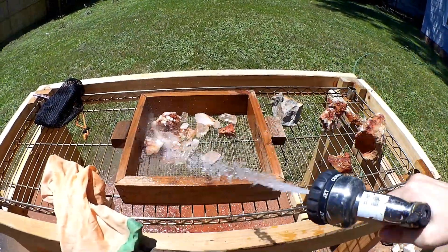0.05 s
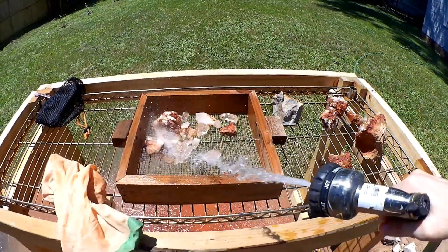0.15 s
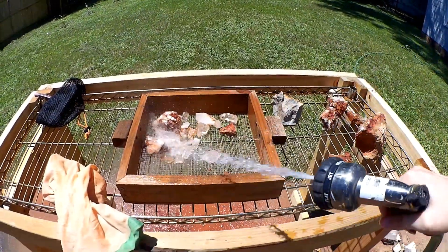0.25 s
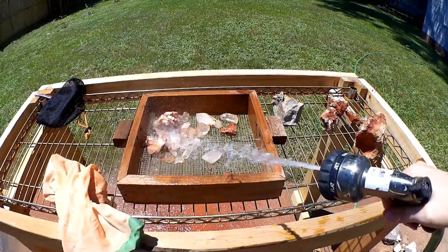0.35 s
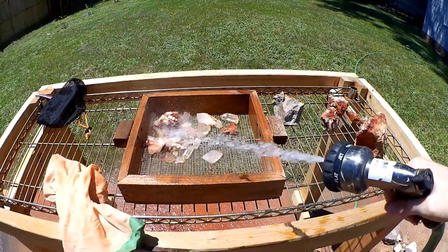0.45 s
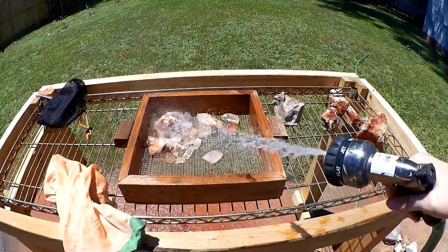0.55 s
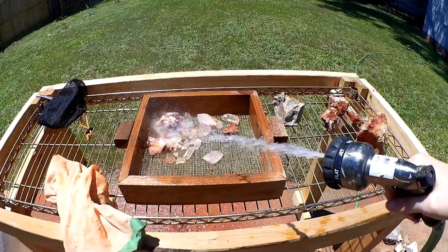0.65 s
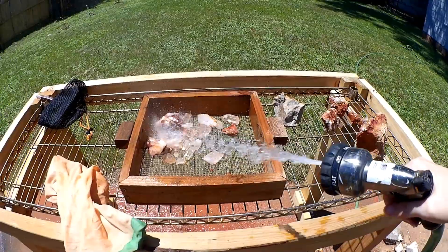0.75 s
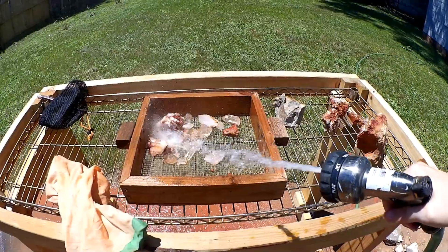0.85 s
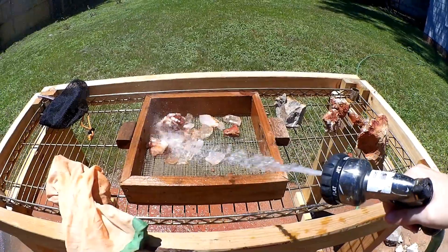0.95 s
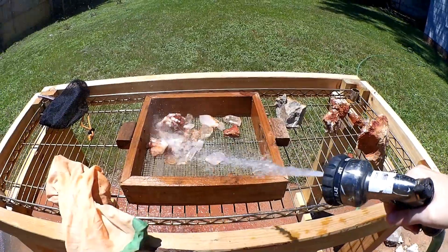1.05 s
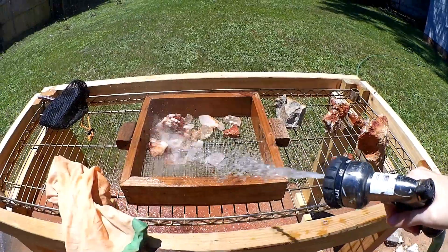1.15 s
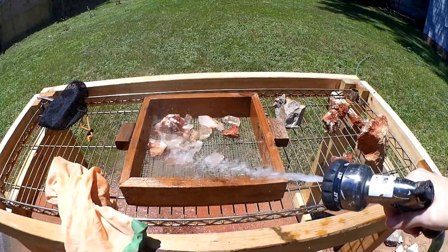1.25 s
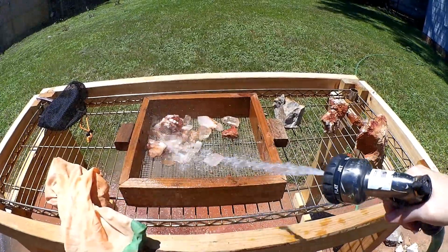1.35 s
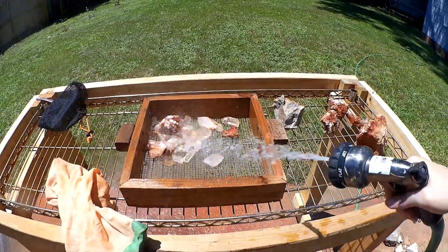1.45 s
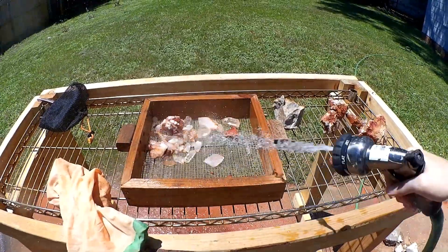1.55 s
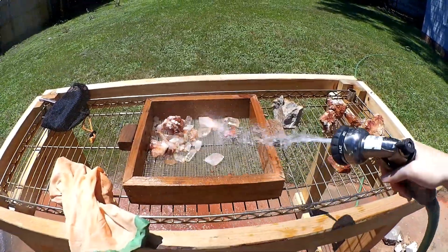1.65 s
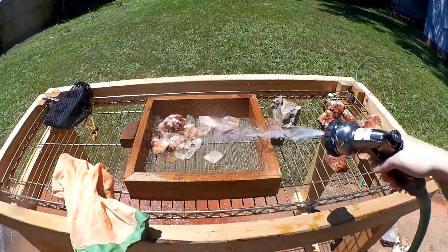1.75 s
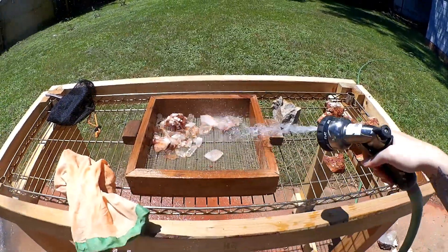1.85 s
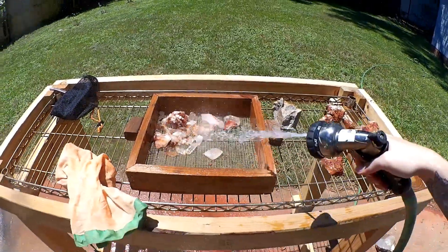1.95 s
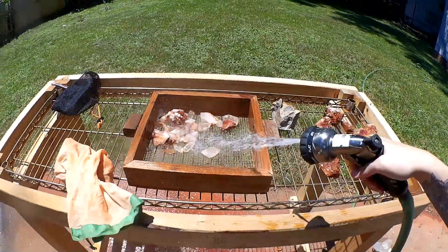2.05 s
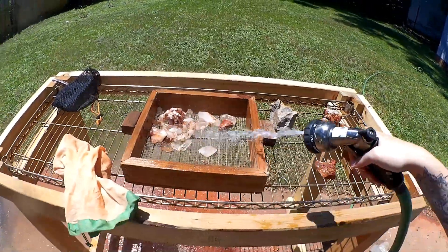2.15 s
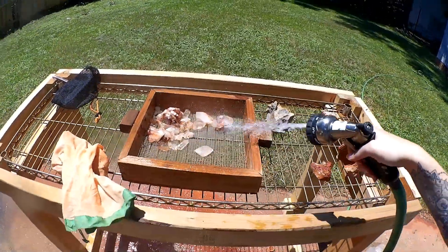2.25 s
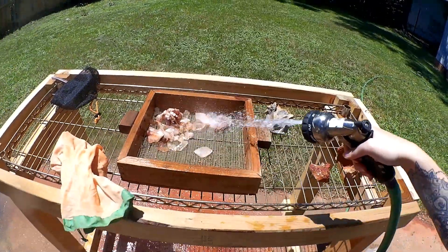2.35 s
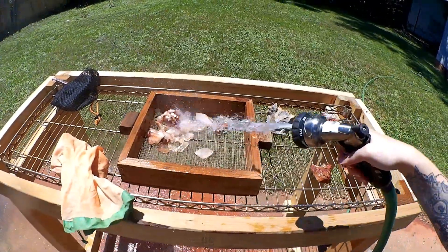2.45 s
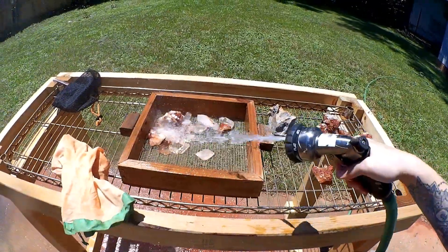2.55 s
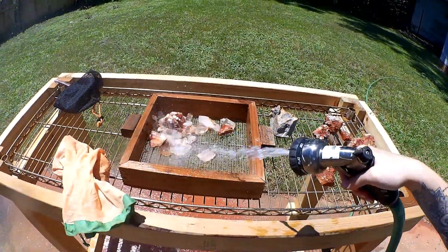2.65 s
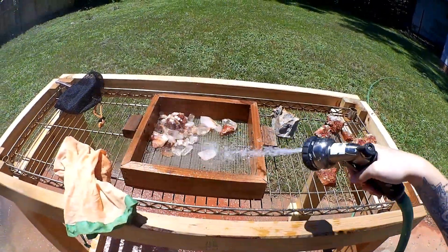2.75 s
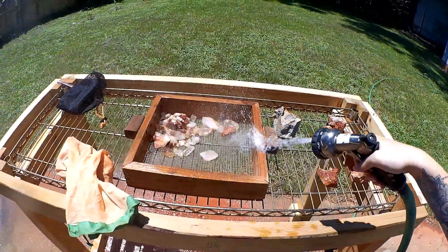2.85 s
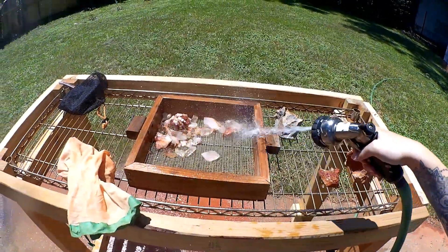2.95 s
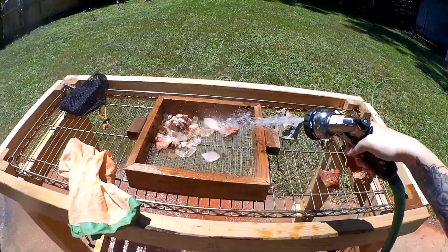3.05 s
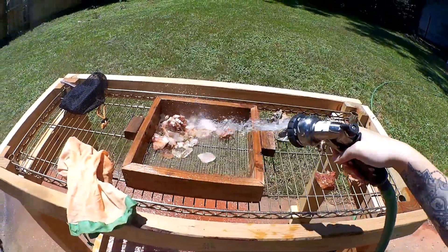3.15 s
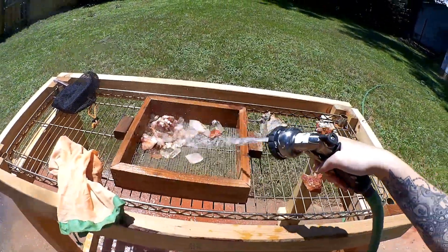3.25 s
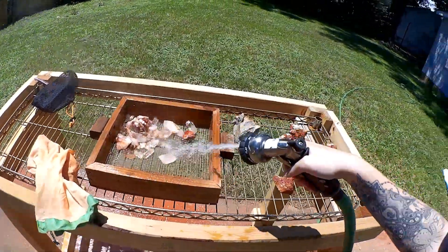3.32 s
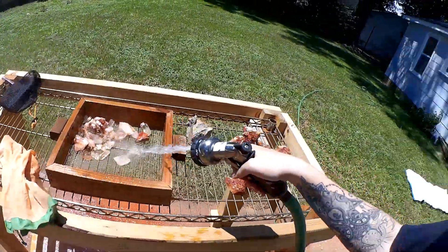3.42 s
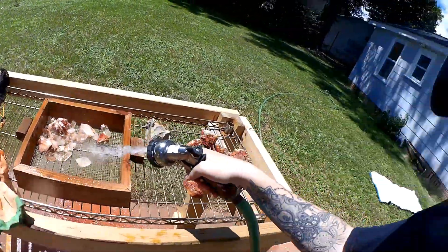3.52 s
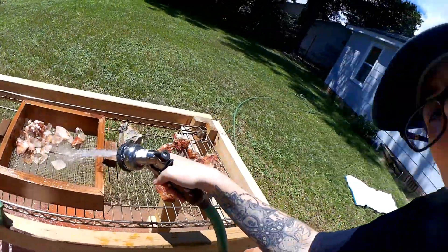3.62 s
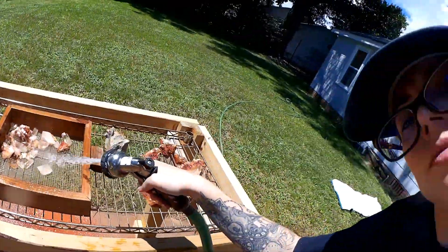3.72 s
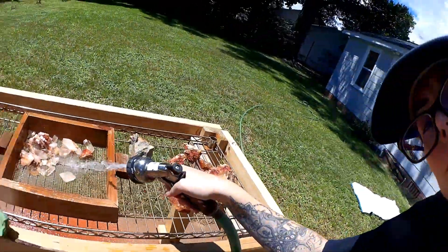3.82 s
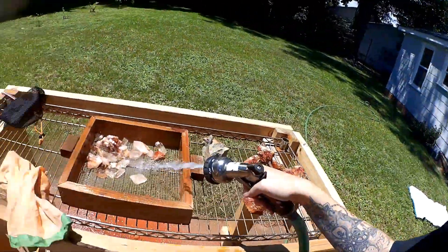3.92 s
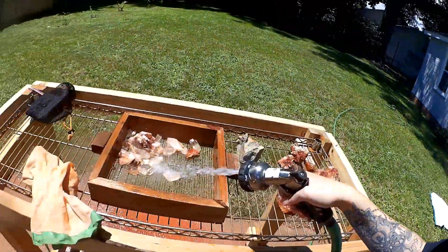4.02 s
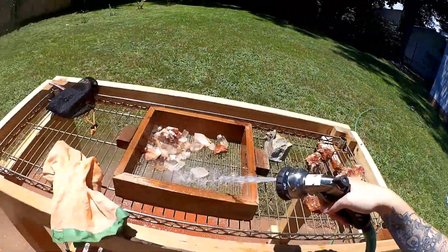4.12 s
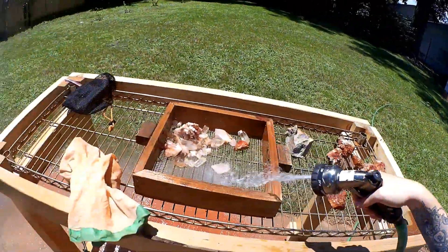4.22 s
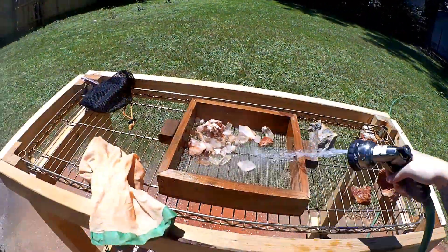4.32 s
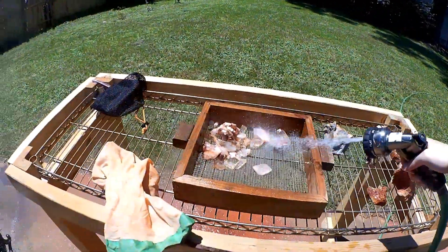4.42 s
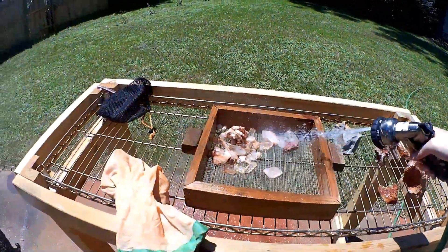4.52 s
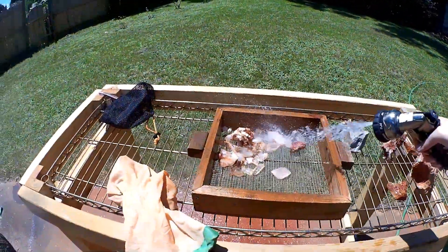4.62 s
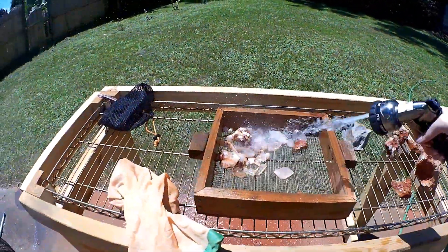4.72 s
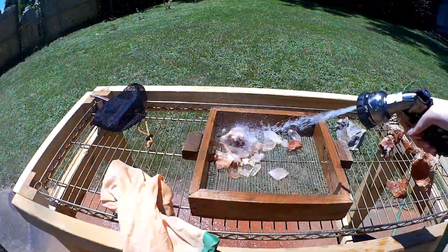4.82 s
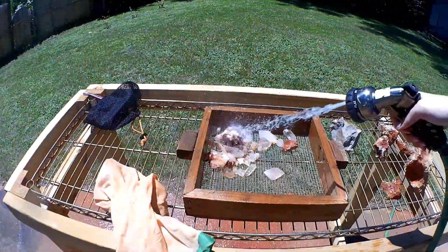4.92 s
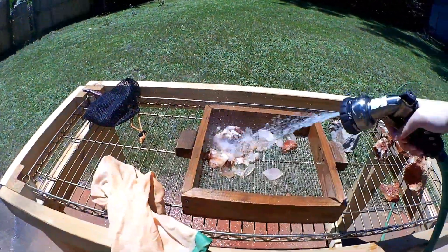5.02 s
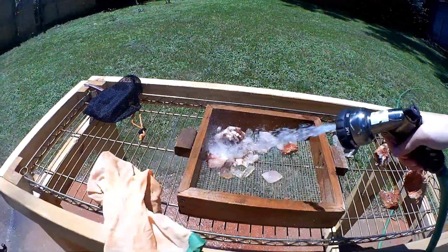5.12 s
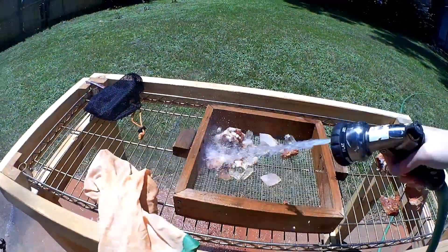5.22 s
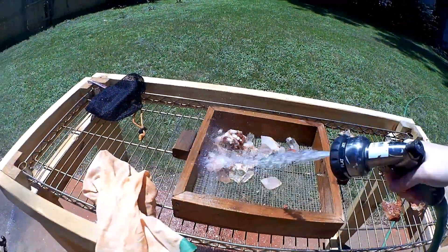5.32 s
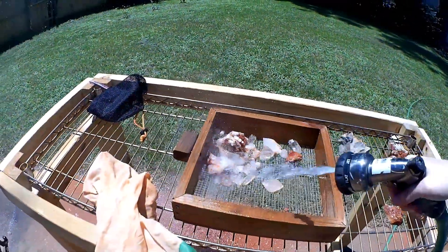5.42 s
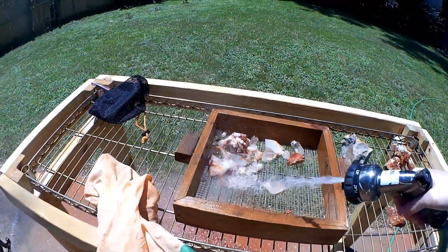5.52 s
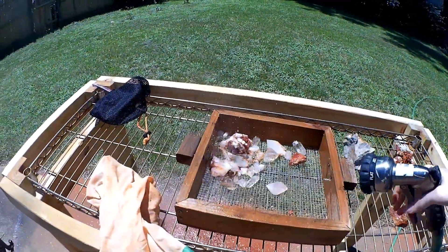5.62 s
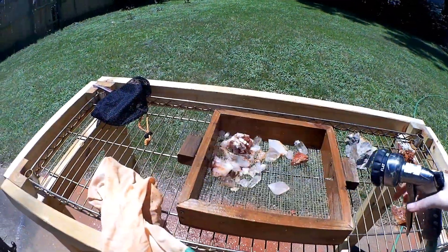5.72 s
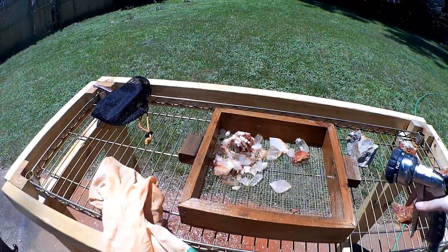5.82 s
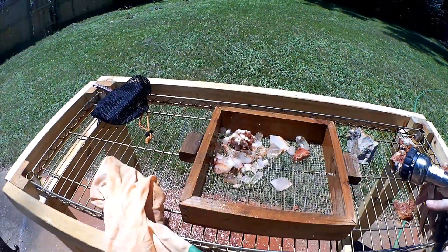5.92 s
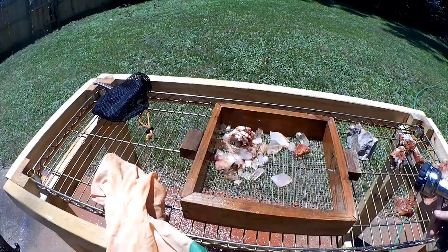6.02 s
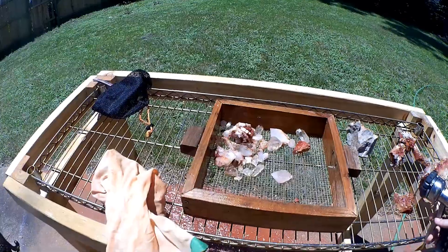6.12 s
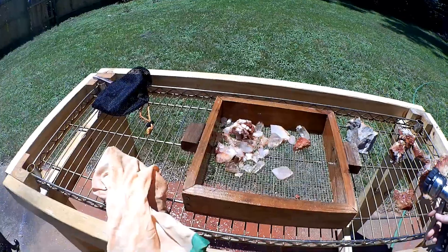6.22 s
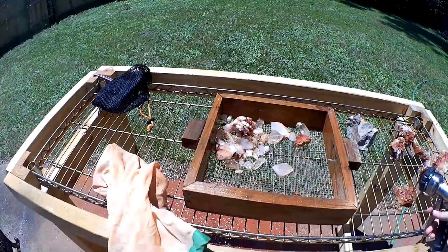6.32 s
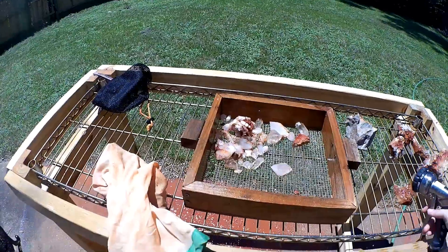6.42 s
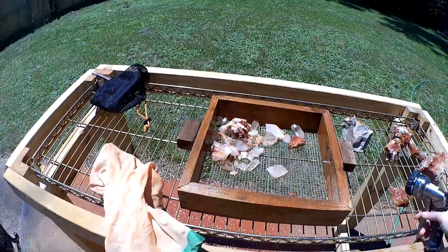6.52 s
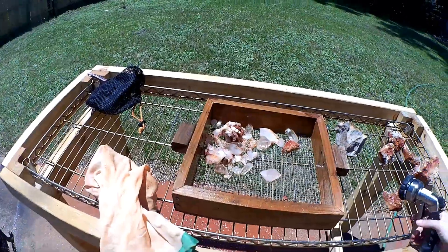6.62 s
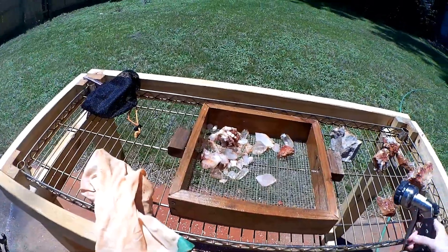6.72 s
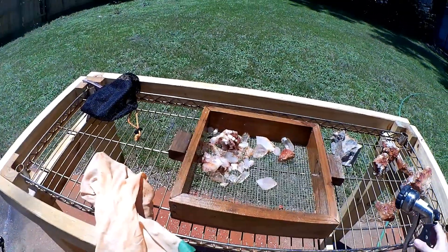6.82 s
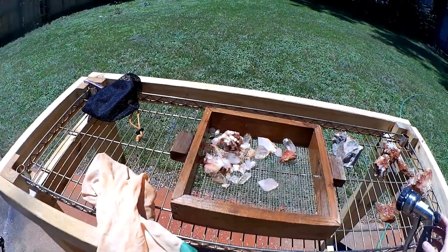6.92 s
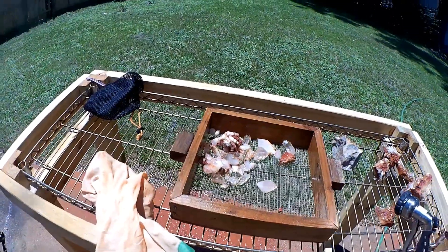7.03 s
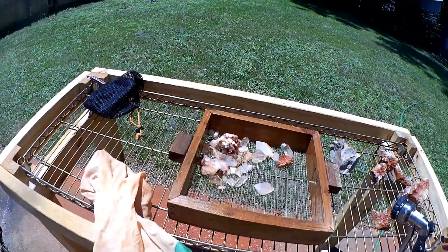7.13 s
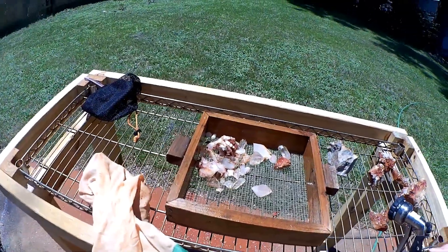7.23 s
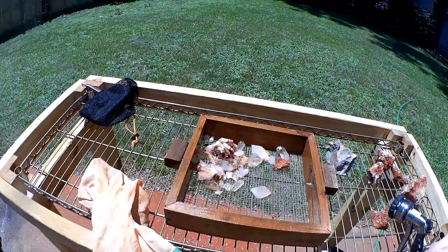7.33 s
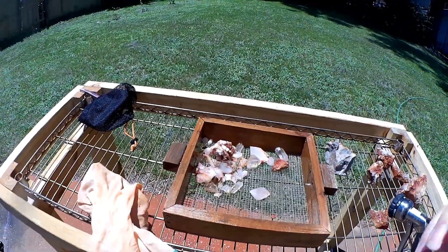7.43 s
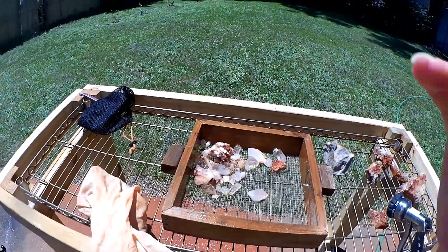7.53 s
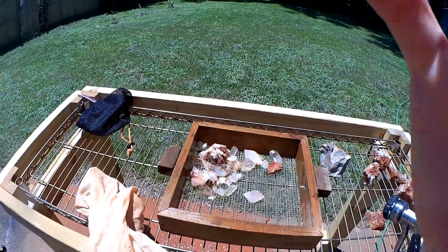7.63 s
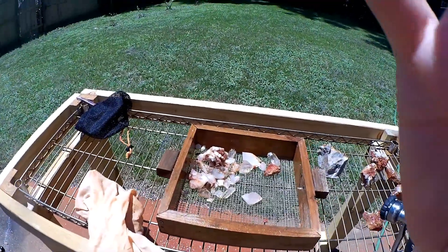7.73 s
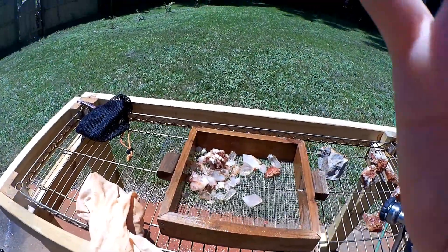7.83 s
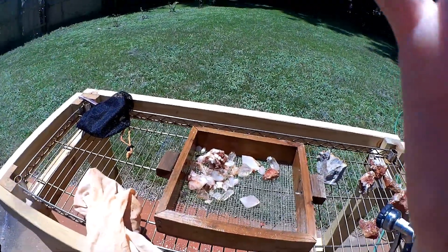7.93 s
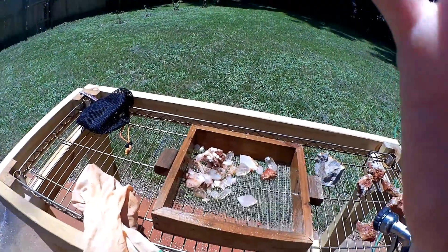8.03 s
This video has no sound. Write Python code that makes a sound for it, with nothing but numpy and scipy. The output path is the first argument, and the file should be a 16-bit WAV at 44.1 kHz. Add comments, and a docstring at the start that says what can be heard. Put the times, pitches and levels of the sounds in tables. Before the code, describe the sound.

Bright, spattering hose spray drums on stones and mesh outdoors amid light wind bumps, stops abruptly, and leaves sparse drips and faint handling sounds.

```python
"""A hose jet hisses and crackles first: its drops smack rocks and a wire screen before a hand-held camera.
The valve shuts, water trickles and drips off, the nozzle clicks; gusts buffet the two microphone ports over
a faint outdoor hum. Water is noise shaped by random impact envelopes and coloured by filters; wind is low
noise, its level set by the gusts, with single pressure pulses. Stones and nozzle give decaying sines; scuffs
are grainy noise through modes.
"""
import sys
import numpy as np
from scipy import signal
from scipy.fft import rfft, irfft, next_fast_len
from scipy.io import wavfile
from scipy.ndimage import uniform_filter1d, map_coordinates

SR = 44100
rng = np.random.default_rng(int(sys.argv[2]) if len(sys.argv) > 2 else 0)


def log_audio(samples):
    """Write samples as a 16-bit WAV file to the path given in sys.argv[1]."""
    # one column per channel
    frames = np.atleast_2d(samples).T
    # limit to full scale, then quantise
    limited = np.clip(frames, -1, 1)
    pcm = np.round(limited * 32767).astype(np.int16)
    wavfile.write(sys.argv[1], SR, pcm)


N = 355878

# Far hum of the neighbourhood. Each row: frequency in Hz, relative density in dB per Hz.
OUTDOOR_SPECTRUM = [(30, -14), (207, -3), (323, -9), (805, -5.5), (1220, -10.5), (2060, -14), (4170, -23.5),
                    (5860, -31), (8670, -30), (15400, -43)]
# Coherence of the hum at the ports. Each row: frequency in Hz, left-right likeness (0 to 1).
OUTDOOR_LIKENESS = [(60, .56), (200, 1), (800, 0.8), (2400, 0.41), (8000, .2)]

# Wind turbulence at the ports. Each row: frequency in Hz, relative density in dB per Hz.
BUFFET_SPECTRUM = [(25, -21.5), (139, 5), (291, 0), (487, -13.5), (700, -12.5), (910, -33.5), (1540, -120)]
# Gusts. Each row: start in seconds, length in seconds, buffet level in dB, left-right difference in dB.
GUSTS = [(.74, 0.13, -61, -12), (1.096, 0.18, -48.5, -6), (1.466, 0.087, -43, -4),
         (1.593, 0.029, -44.5, -1), (1.66, 0.028, -36.5, 0), (1.711, 0.055, -43.5, 8),
         (1.81, 0.063, -49, 10), (1.921, 0.069, -44.5, 11.5), (2.033, 0.11, -47.5, 8),
         (2.272, 0.075, -50, 8.5), (2.551, 0.025, -51, 12), (2.67, 0.076, -46.5, 5), (2.858, 0.07, -50, 6),
         (3.709, 0.25, -42.5, 7), (4.546, 0.13, -52, 5), (7.787, 0.078, -59, -16), (7.934, 0.06, -58, -12)]
# Single eddies. Each row: start in seconds, level in dB, left-right difference in dB.
PUFFS = [(1.091, -32.5, -14), (1.497, -30, 15), (1.763, -37, 8), (1.782, -30, 7), (2.033, -32.5, 16),
         (2.299, -35.5, 14), (3.787, -34.5, 10), (3.857, -32, -27), (3.896, -30.5, -17), (3.952, -35.5, 12),
         (4.098, -34.5, 10)]
GUST_RISE_DB_PER_S, GUST_FALL_DB_PER_S, CALM_DB = 300, 347, -72.5
# Above the edge, buffeting grows as this power of the gust, matching the low part at the strong level.
EDGE_HZ, EDGE_POWER, STRONG_DB = 217, 1.8, -35

RUMBLE_DB, RUMBLE_FROM_HZ = -69, 180  # low rumble while the water runs

# Short scuffs of hand or nozzle. Each row: start in seconds, length in seconds, level in dB.
RUBS = [(6.484, 0.068, -53.5), (7.712, 0.045, -64)]
# Modes that ring when scuffed. Each row: frequency in Hz, width in Hz, level in dB.
RUBBED_MODES = [(422, 51, -2), (890, 60, -1), (1223, 52.4, 0.5), (2080, 150, -6), (3650, 200, -4.5),
                (7100, 870, -12)]
# Stones tip against one another, and the nozzle clicks at 6.648 s.
# Each row: start in seconds, level in dB, ring frequency in Hz.
KNOCKS = [(.244, -23.5, 1870), (4.459, -24.5, 1500), (4.466, -22.5, 2000), (5.424, -22.5, 2630),
          (6.648, -37.5, 2340)]
KNOCK_CYCLES = 9.2  # cycles in which a knock decays by 60 dB

# Single drops, a dull knock at 3 s and the noisy part of the nozzle's click at 6.648 s.
# Each row: start in seconds, level in dB, low part in dB relative to that level.
SMACKS = [(1.0874, -13, -28), (3, -26, -2), (4.121, -19.5, -14), (5.2912, -7.5, -17), (5.727, -35, -16),
          (5.734, -29.5, -19), (5.765, -39, -5), (5.8145, -31, -12), (5.839, -34.5, -18),
          (5.8932, -27.5, -10), (5.9, -32, -13.5), (5.922, -34.5, -8), (5.967, -33, -9),
          (5.9808, -34.5, -3.5), (6.015, -27.5, -20), (6.022, -29, -5), (6.0872, -35.5, -8),
          (6.118, -33.5, -20), (6.147, -32.5, -16), (6.1497, -30.5, -14), (6.1675, -30, -24),
          (6.2075, -39.5, -19), (6.2215, -32.5, -16.5), (6.231, -31, -25), (6.2538, -23.5, -23),
          (6.324, -34, -19), (6.3392, -47.5, -3), (6.3798, -36.5, -26), (6.434, -35.5, -25),
          (6.56, -42.5, -15), (6.648, -27, -7), (6.796, -48, -15), (7.0797, -43, -11), (7.309, -49, -13),
          (7.43, -48, -34), (7.6174, -46.5, -17)]
SHUT_S, SHUT_DB_PER_S = 5.685, 704  # the valve closes and the jet dies
# Water running off fades, then stops.
RUNOFF_DB, RUNOFF_DB_PER_S, DRAINED_S, DRAIN_DB_PER_S = -56, 5, 6.02, 64
DAMP_DB, DAMP_DB_PER_S = -71, 8  # the faint patter that lingers

# A hollow spot under the jet. In order: start in seconds, end in seconds, pitch in Hz, width in Hz, level in dB.
HOLLOW = (3.5, 4.1, 1100, 110, -54)
# How hard the wandering jet strikes stone. Each row: time in seconds, spray level in dB.
SPRAY_LEVEL = [(0.03, -31.5), (0.14, -35.5), (0.35, -33.5), (0.86, -33.5), (1.09, -30.5), (1.65, -38),
               (1.85, -34), (2.22, -41), (2.28, -35.5), (2.63, -33.5), (2.78, -39.5), (3.27, -35.5),
               (3.3, -40.5), (3.82, -43), (4.12, -38.5), (4.16, -42.5), (4.37, -41), (4.58, -34),
               (4.61, -40.5), (4.7, -34), (4.785, -38), (4.81, -30.5), (5.02, -30.5), (5.25, -37),
               (5.3, -33.5), (5.68, -32)]
# Mid spatter against the spray. Each row: time in seconds, relative level in dB.
SPATTER_LEVEL = [(.76, -4.5), (1, -7.5), (1.35, -6), (2, -6.5), (2.5, -5), (4.7, -6), (4.9, -4), (5.2, -5)]
# The jet's dull drumming on stones and frame. Each row: time in seconds, level in dB.
DRUM_LEVEL = [(0.03, -42.5), (0.85, -45), (1.24, -42.5), (2.04, -46.5), (3.93, -48), (4.91, -44),
              (5.68, -43)]
# Small drops. Each row: frequency in Hz, relative density in dB per Hz.
FIZZ_SPECTRUM = [(5600, -35.5), (6200, -8.5), (7100, 0), (8400, -0.5), (10000, -6.5), (12000, -17.5),
                 (14000, -26), (15500, -43.5)]
# Middle part of the spray. Each row: frequency in Hz, relative density in dB per Hz.
SPATTER_SPECTRUM = [(1410, -35), (2400, -6.5), (2590, -8.5), (3250, -2), (4040, 2.5), (4490, -2),
                    (5210, -1), (6200, -8), (8060, -38), (13600, -120)]
# Big drops on stone and frame. Each row: frequency in Hz, relative density in dB per Hz.
DRUM_SPECTRUM = [(260, -21), (450, -19), (809, -9.5), (1380, -9.5), (1950, -3.5), (2600, -8.5),
                 (3380, -11.5), (5720, -120)]
# Fizz level re the spray; beyond the facing bearing, fizz gives way as the camera turns.
FIZZ_DB, FACING_US, SHADE_DB_PER_US = -0.5, 26, 0.0633

# Turn of the camera. Each row: time in seconds, lead of the left port in microseconds.
BEARING = [(0, 21.6), (1, 14.5), (2.8, 2.2), (3.3, 19.5), (3.7, 60), (4.1, 17), (4.6, 4.1)]
# Coherence of the near sources at the ports. Each row: frequency in Hz, left-right likeness (0 to 1).
NEAR_LIKENESS = [(4000, 0.96), (6000, 0.63), (8500, 0.73), (14000, 0.5)]
# Colour of the ports. Each row: frequency in Hz, left-right difference in dB.
PORT_COLOUR = [(900, -3.5), (2000, -1), (3800, -1), (5400, -4), (7000, -1), (8800, 3.5), (12000, 0)]
NOTCH_HZ, NOTCH_WIDTH_HZ, TOP_HZ = 7940, 230, 15540


def amp(db):
    """Decibels are logarithmic: twenty of them are a tenfold gain."""
    return 10 ** (np.asarray(db) / 20)


def unit(x):
    """Normalisation: dividing by the root mean square gives rms 1."""
    return x / np.sqrt(np.mean(x ** 2) + 1e-20)


def along(points, hz):
    """Interpolation of (Hz, value) points on a logarithmic frequency axis."""
    f, v = np.transpose(points)
    return np.interp(np.log(hz + 1), np.log(f + 1), v)


def curves(rows):
    """Linear interpolation in time: one curve for each column after the seconds."""
    s, *cols = np.transpose(rows)
    return [np.interp(np.arange(N) / SR, s, c) for c in cols]


def span_db(start, end, rise_db_per_s, fall_db_per_s):
    """Exponential onset and decay: 0 dB from start to end, straight slopes in dB on either side."""
    t = np.arange(N) / SR
    before = np.maximum(start - t, 0)
    after = np.maximum(t - end, 0)
    return -rise_db_per_s * before - fall_db_per_s * after


def wobble(rate):
    """Slow random fluctuation: a spline through random knots, rate of them a second."""
    knots = rng.standard_normal(int(N * rate / SR) + 4)
    return map_coordinates(knots, [np.arange(N) * rate / SR])


def filtered(x, response):
    """Linear filtering: the spectrum of x times a complex response of frequency."""
    m = next_fast_len(N + SR // 2)
    return irfft(rfft(x, m) * response(np.fft.rfftfreq(m, 1 / SR)), m)[..., :N]


def coloured(x, spectrum, size=4096):
    """Minimum phase: folding the cepstrum makes a causal filter with this spectrum."""
    level_db = np.maximum(along(spectrum, np.fft.rfftfreq(size, 1 / SR)), -70)
    cepstrum = irfft(np.log(amp(level_db)), size)
    cepstrum[1:size // 2] *= 2
    cepstrum[size // 2 + 1:] = 0
    impulse = irfft(np.exp(rfft(cepstrum)), size)
    return signal.fftconvolve(x, impulse[None], axes=1)[:, :N]


def resonance(f, hz, width_hz):
    """Resonance: the band-pass response of one damped mode, 1 at its centre."""
    return 1j * f * width_hz / (hz ** 2 - f ** 2 + 1j * f * width_hz)


def paired(x, alike):
    """Coherence: two unrelated signals mixed as sum and difference to a left-right likeness."""
    def turn(hz):
        return np.arccos(np.clip(along(alike, hz), -1, 1)) / 2

    mid, side = filtered(x, lambda hz: np.array([np.cos(turn(hz)), np.sin(turn(hz))]))
    return np.array([mid + side, mid - side])


def impacts(rate, spread_db, burst_s, bed=0.83):
    """Shot noise: rate random smacks a second, power decaying by e in burst_s, over a steady mist (bed)."""
    sizes = (rng.random(N) < rate / SR) * amp(spread_db * np.clip(rng.standard_normal(N), -3, 2.5))
    life = np.exp(-np.arange(400) / (burst_s * SR))
    power = abs(signal.fftconvolve(sizes ** 2, life)[:N])
    return unit(rng.standard_normal((2, N)) * np.sqrt(power / power.mean() + bed))


def patchy(x, depth_db):
    """Time-frequency modulation: random patches of gain, as the spray wanders over uneven stones."""
    z = signal.stft(x, nperseg=512)[2]
    field = uniform_filter1d(rng.standard_normal(z.shape[1:]), size=7, axis=0)
    field = uniform_filter1d(field, size=16, axis=1)
    return signal.istft(z * amp(depth_db * unit(field)), nperseg=512)[1][:, :N]


def outdoors():
    """Diffuse field: a steady far hum whose likeness at the two ports depends on frequency."""
    noise = paired(rng.standard_normal((2, N)), OUTDOOR_LIKENESS)
    hum = unit(coloured(noise, OUTDOOR_SPECTRUM))
    return amp(-64.5 + np.array([[-1.2], [1.2]])) * hum


def puffs():
    """Pressure pulse: each single eddy pushes the diaphragm with a rounded shove and a slower return."""
    pulses, t = np.zeros((2, N + SR)), np.arange(SR // 50) / SR
    for s, db, side_db in PUFFS:
        u = t / 0.0006 * amp(0.6 * (db + 32))  # weaker eddies are slower
        push = u ** 2 * (3 - u) * np.exp(-u)
        at = round(s * SR)
        pulses[:, at:at + len(u)] -= amp(db + np.array([[side_db], [-side_db]]) / 2) * push
    return pulses[:, :N]


def wind():
    """Turbulence: lumpy low buffeting, unrelated from port to port, that brightens in stronger gusts."""
    lumps = amp(4.5 * np.minimum([wobble(45), wobble(45)], 1.4))
    buffet = unit(lumps * coloured(rng.standard_normal((2, N)), BUFFET_SPECTRUM))
    low = filtered(buffet, lambda hz: 1 / (1 + (hz / EDGE_HZ) ** 4))
    gusts = amp(CALM_DB)
    for s, length, db, side_db in GUSTS:
        balance = amp([[side_db / 2], [-side_db / 2]])
        swell_db = span_db(s, s + length, GUST_RISE_DB_PER_S, GUST_FALL_DB_PER_S)
        gusts = gusts + balance * amp(db + swell_db)
    edge = amp(STRONG_DB) * (gusts / amp(STRONG_DB)) ** EDGE_POWER
    return gusts * low + edge * (buffet - low) + puffs()


def rumble():
    """Incoherent noise: a low rumble, unrelated from port to port, lasts as long as the water runs."""
    def response(hz):
        return amp(along(BUFFET_SPECTRUM, hz)) / (1 + (RUMBLE_FROM_HZ / (hz + 1)) ** 4)

    noise = filtered(rng.standard_normal((2, N)), response)
    return amp(RUMBLE_DB + span_db(0, SHUT_S, 0, SHUT_DB_PER_S)) * unit(noise)


def rubs():
    """Friction excites modes: grains swell and fade in a bright scrape that sinks into a low knock."""
    t = np.arange(N) / SR

    def stroke(late):
        """Sine-squared envelopes: a larger exponent puts the peak later."""
        total = 0
        for s, length, db in RUBS:
            total = total + amp(db) * np.sin(np.pi * np.clip((t - s) / length, 0, 1) ** late) ** 2
        return total

    def body(f):
        """Superposition: the modes add with alternating sign."""
        return sum((-1) ** k * amp(db) * resonance(f, hz, width_hz)
                   for k, (hz, width_hz, db) in enumerate(RUBBED_MODES))

    def low(f):
        return 1 / (1 + (f / 1500) ** 4)

    grains = impacts(900, spread_db=0.5, burst_s=0.001)
    scrape = filtered(stroke(0.99) * grains, lambda f: 1 - low(f))
    thud = 0.99 * filtered(stroke(2.1) * grains, low)
    return filtered(scrape + thud, body) / filtered(grains[0], body).std()


def knocks():
    """Damped oscillation: wet stones clack, and the nozzle clicks, as sines that die in a few cycles."""
    blows, t = np.zeros((2, N + SR)), np.arange(SR // 50) / SR
    for s, db, hz in KNOCKS:
        decay = amp(db - 60 * t * hz / KNOCK_CYCLES)
        onset = 2 * (1 - np.exp(-3 * t * hz))
        at = round(s * SR)
        blows[0, at:at + len(t)] += decay * np.sin(2 * np.pi * hz * t) * onset
    return blows[:, :N]


def smacks():
    """Impact transient: each drop, knock or click is a dry crack, then ticking splinters over a short spatter."""
    low, high = np.zeros((2, N + SR)), np.zeros((2, N + SR))
    t = np.arange(SR // 20) / SR
    for s, db, low_db in SMACKS:
        splinters = amp(9.9 * (rng.random(len(t)) < 500 / SR))
        envelope = amp(-60 * t / 0.0046) + 0.26 * splinters * amp(-60 * t / 0.05)
        smack = envelope * rng.standard_normal((2, len(t)))
        smack[0, 0] = 3  # the crack
        smack /= np.linalg.norm(smack[0])
        at = round(s * SR)
        high[:, at:at + len(t)] += amp(db + 19.5) * smack
        low[:, at:at + len(t)] += amp(db + low_db + 26) * smack
    dull = filtered(high, lambda hz: 1 / (1 + 1j * hz / 11000) ** 2)  # a lone drop has less top than the mist
    return coloured(dull, FIZZ_SPECTRUM) + coloured(low, SPATTER_SPECTRUM) + 0.3 * coloured(low, DRUM_SPECTRUM)


def trickle():
    """Sparse shot noise: small drops patter from the screen after the valve shuts, fading exponentially."""
    since = np.arange(N) / SR - SHUT_S
    runoff = amp(RUNOFF_DB - RUNOFF_DB_PER_S * since + span_db(0, DRAINED_S, 0, DRAIN_DB_PER_S))
    damp = amp(DAMP_DB - DAMP_DB_PER_S * since)
    drops = amp(1.42 * wobble(31)) * impacts(260, spread_db=3, burst_s=0.0006, bed=0.12)
    fizz = amp(2.3 * wobble(45)) * unit(coloured(drops, FIZZ_SPECTRUM))
    spatter = 0.67 * amp(0.93 * wobble(45)) * unit(coloured(drops, SPATTER_SPECTRUM))
    return (since > 0) * (runoff + damp) * unit(fizz + spatter)


def hollow():
    """Cavity resonance: a hollow among the stones hums in a narrow band while the jet passes over it."""
    start, end, hz, width_hz, db = HOLLOW
    passing = np.sin(np.pi * np.clip((np.arange(N) / SR - start) / (end - start), 0, 1))
    hum = unit(filtered(rng.standard_normal((2, N)), lambda f: resonance(f, hz, width_hz)))
    return amp(db) * passing * hum


def jet():
    """Clumped shot noise: slugs of water arrive; small drops fizz, big ones drum on stone and frame."""
    spray_db, = curves(SPRAY_LEVEL)
    shade_db = SHADE_DB_PER_US * np.maximum(curves(BEARING)[0] - FACING_US, 0)
    clumps_db = 1.01 * wobble(25) + 0.63 * wobble(110)
    drops = impacts(2500, spread_db=4, burst_s=0.00031)
    # Lone drops crack dry, mostly in the treble.
    snap_sizes = (rng.random(N) < 90 / SR) * amp(22.5 - 8.2 * rng.random(N))
    snaps = snap_sizes * rng.choice([-1, 1], (2, N))
    big = drops + 0.7 * impacts(1600, spread_db=0.5, burst_s=0.00036)

    fizz_db = spray_db + FIZZ_DB - shade_db + 1.39 * clumps_db + 0.46 * wobble(18)
    fizz = amp(fizz_db) * unit(coloured(drops + snaps, FIZZ_SPECTRUM))
    spatter_db = spray_db + curves(SPATTER_LEVEL)[0] + 0.5 * shade_db + clumps_db
    spatter = amp(spatter_db) * unit(coloured(drops + 0.4 * snaps, SPATTER_SPECTRUM))
    drum_db = curves(DRUM_LEVEL)[0] + 0.52 * clumps_db
    drum = amp(drum_db) * unit(coloured(big, DRUM_SPECTRUM))
    return amp(span_db(0, SHUT_S, 0, SHUT_DB_PER_S)) * patchy(fizz + spatter + drum, depth_db=1.0)


def ports(x):
    """Arrival-time difference: the left port hears first as the camera's turn dictates; colours differ."""
    hz, t, z = signal.stft(paired(x, NEAR_LIKENESS), SR, nperseg=512)
    lead_s = np.interp(t, *np.transpose(BEARING)) * 1e-6
    # Half the difference in level and phase goes to each port, in opposite senses.
    half = amp(along(PORT_COLOUR, hz) / 2)[:, None] * np.exp(1j * np.pi * hz[:, None] * lead_s)
    return signal.istft(z * [half, 1 / half], SR, nperseg=512)[1][:, :N]


def scene():
    """Superposition: near sources pass the port model, then rumble, wind and hum are added."""
    near = jet() + hollow() + trickle() + smacks() + knocks() + rubs()
    return ports(near) + rumble() + wind() + outdoors()


def record(dry):
    """Band limitation: the camera cuts deep bass, notches the treble and keeps nothing above its limit."""
    def response(hz):
        bass_cut = (1j * hz / (45 + 1j * hz)) ** 2
        notch = 1 - 0.93 * resonance(hz, NOTCH_HZ, NOTCH_WIDTH_HZ)
        return bass_cut * notch * (hz < TOP_HZ)

    return filtered(dry, response)


dry = scene()
out = record(dry)
log_audio(out)
```